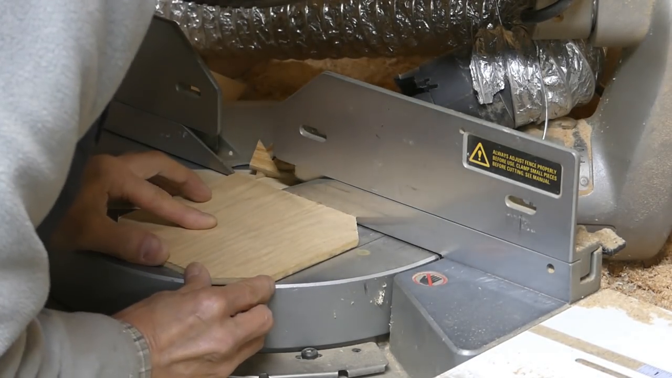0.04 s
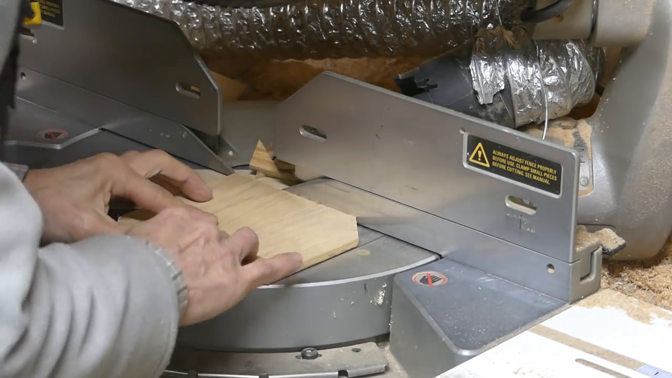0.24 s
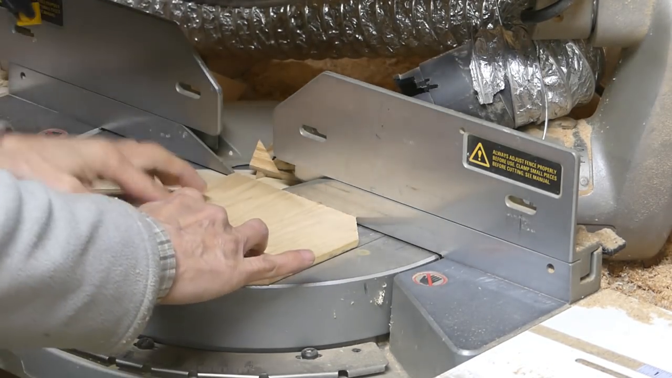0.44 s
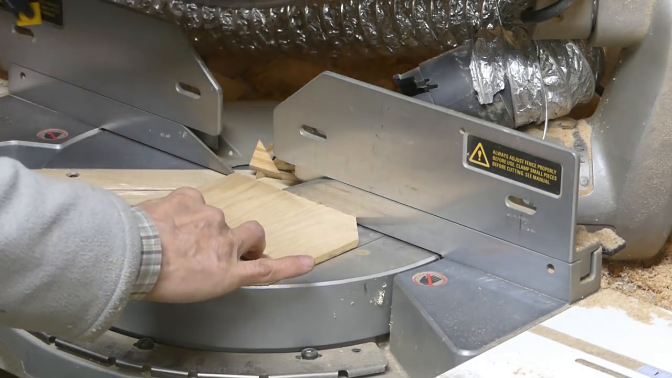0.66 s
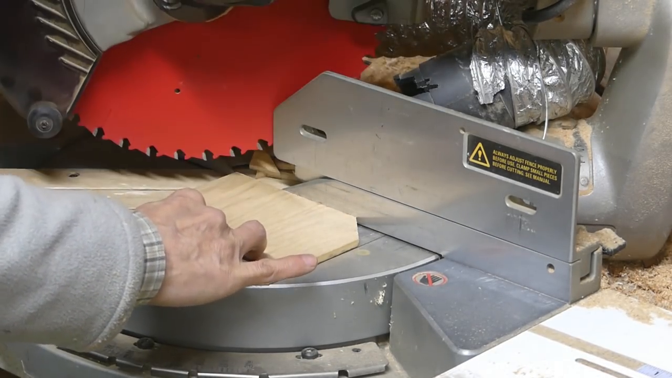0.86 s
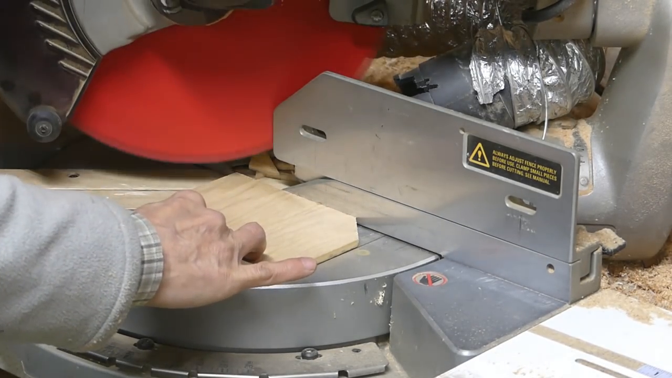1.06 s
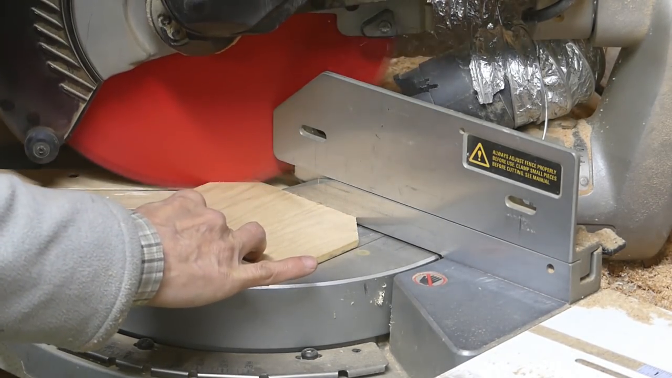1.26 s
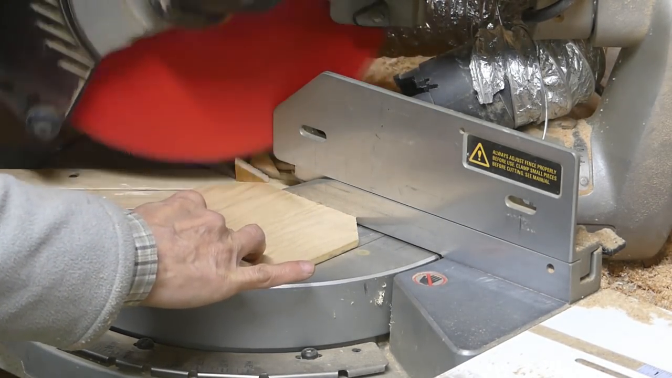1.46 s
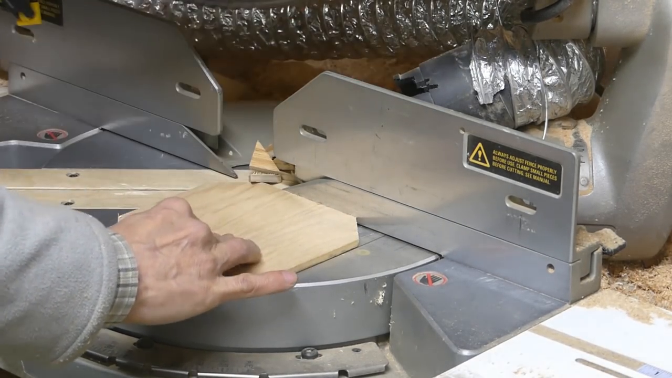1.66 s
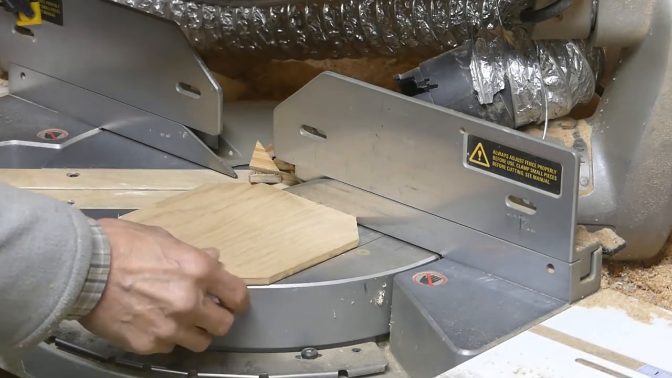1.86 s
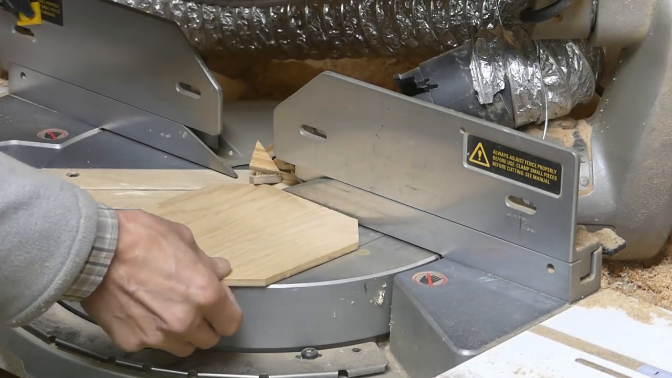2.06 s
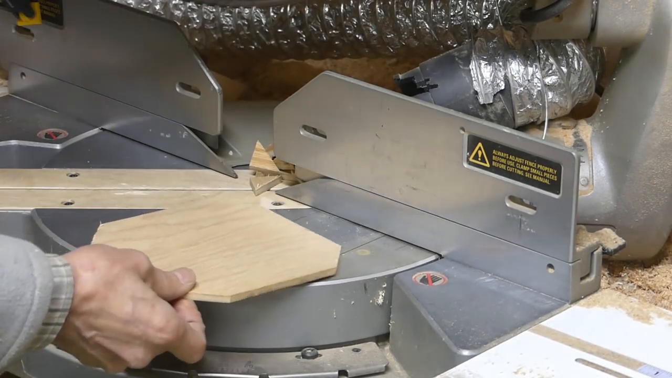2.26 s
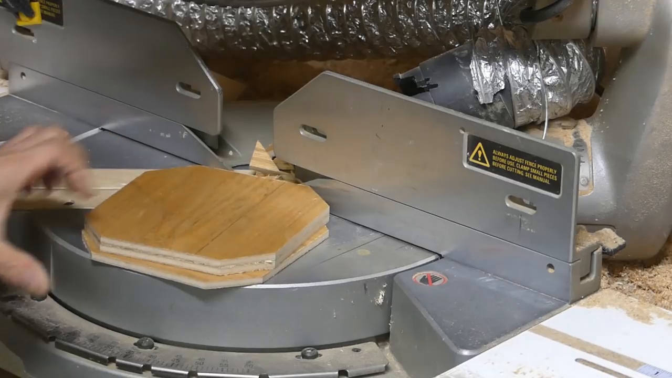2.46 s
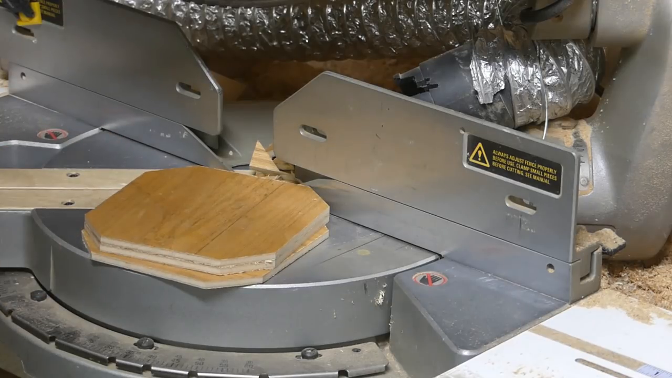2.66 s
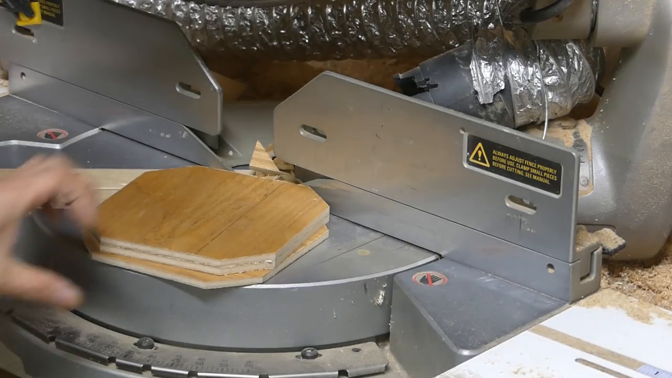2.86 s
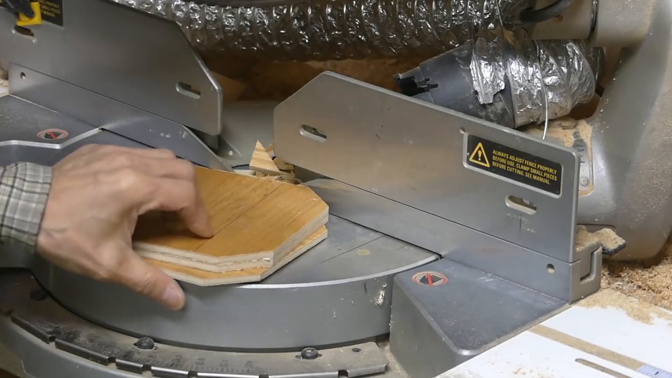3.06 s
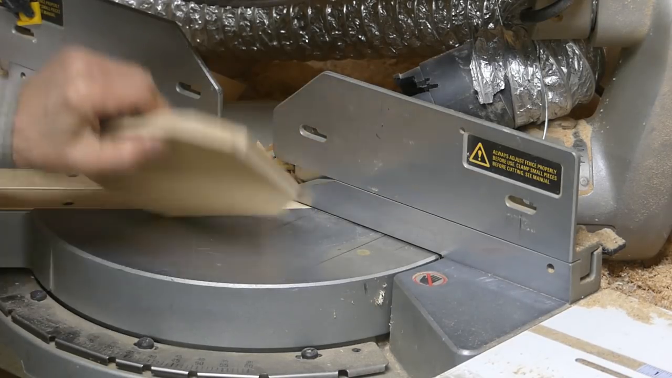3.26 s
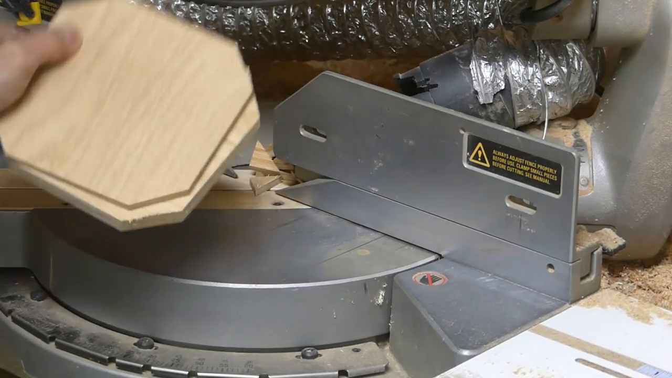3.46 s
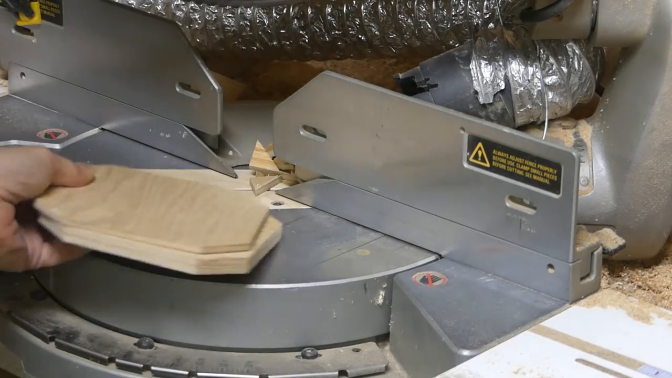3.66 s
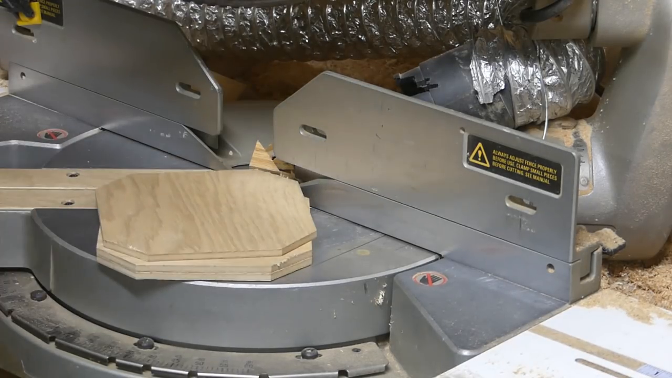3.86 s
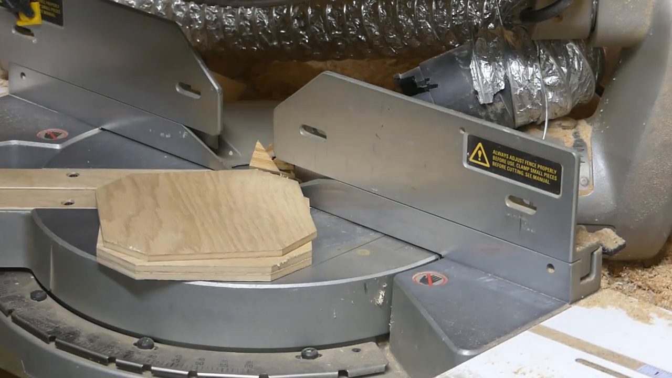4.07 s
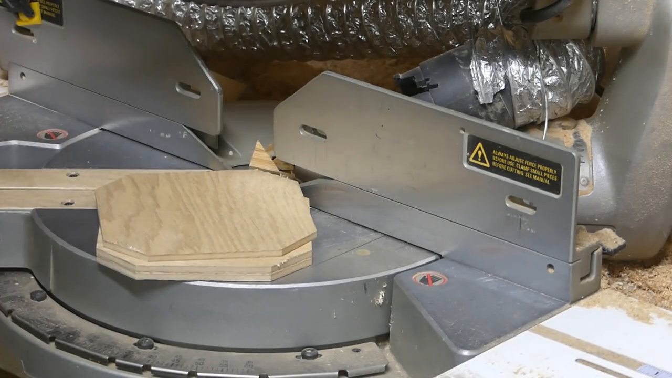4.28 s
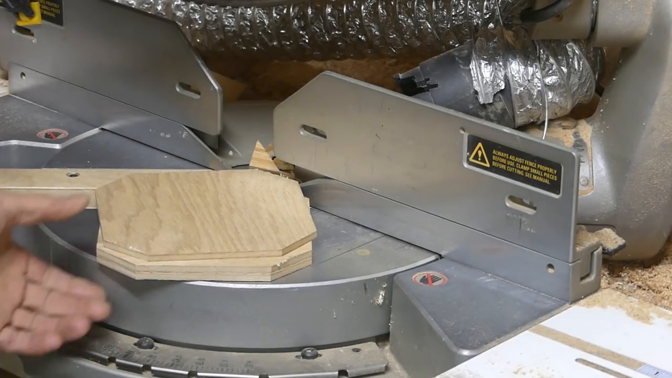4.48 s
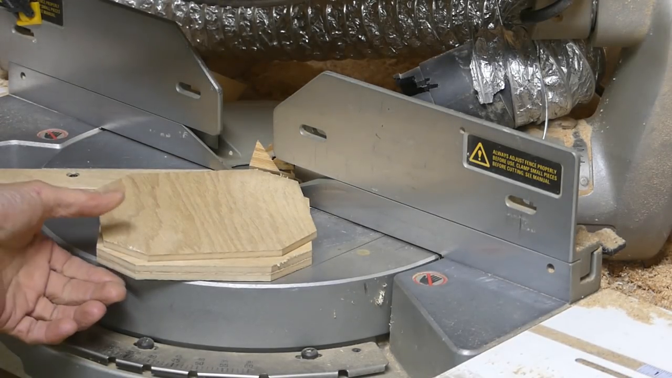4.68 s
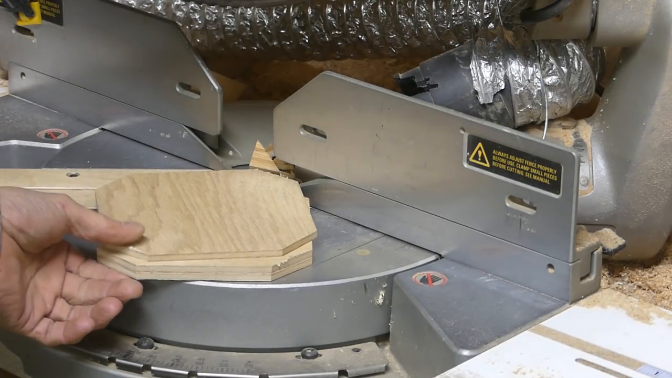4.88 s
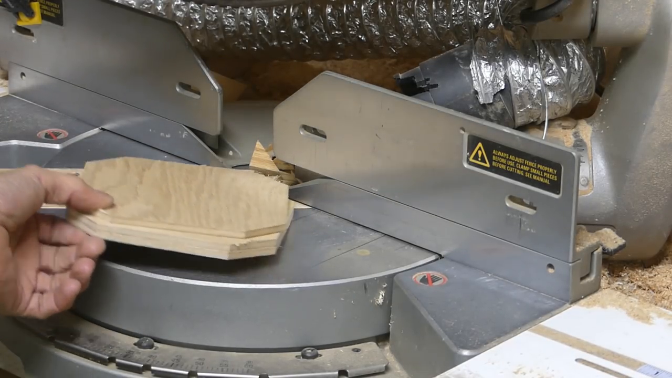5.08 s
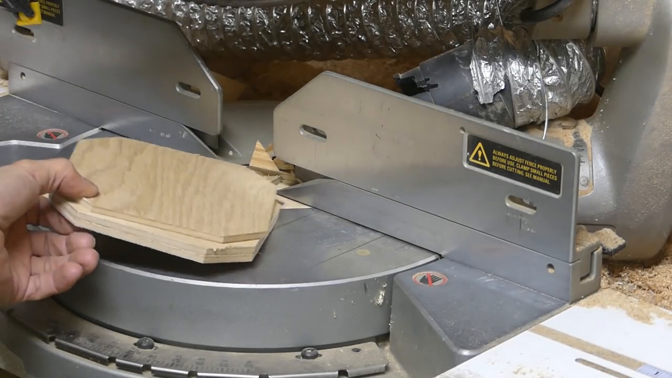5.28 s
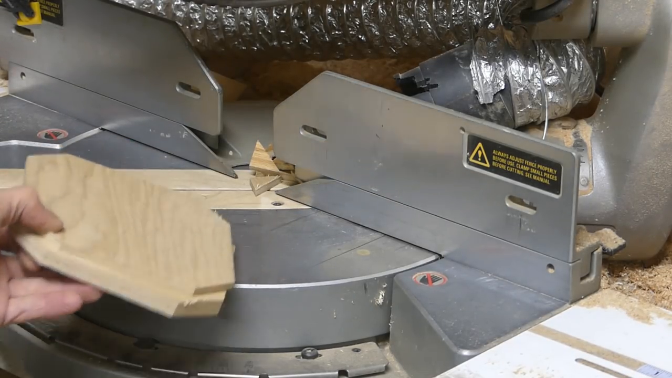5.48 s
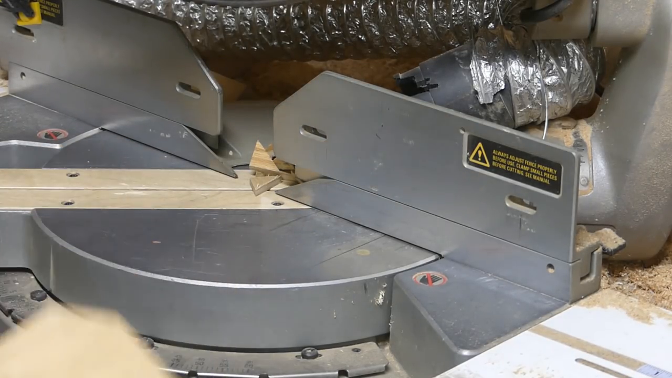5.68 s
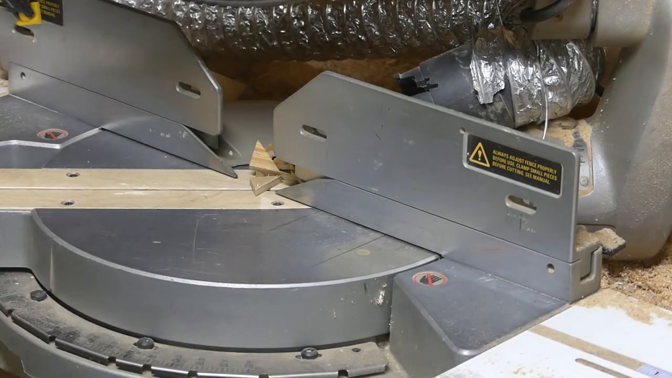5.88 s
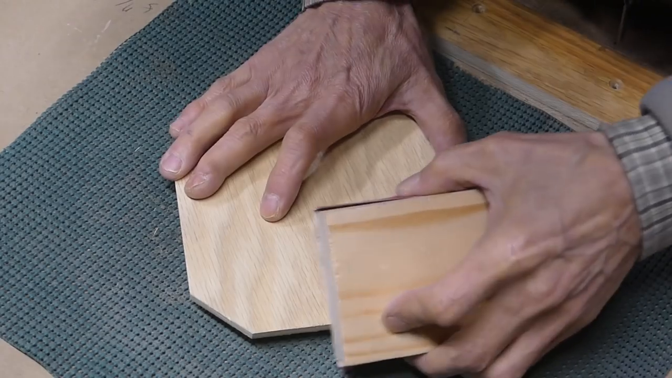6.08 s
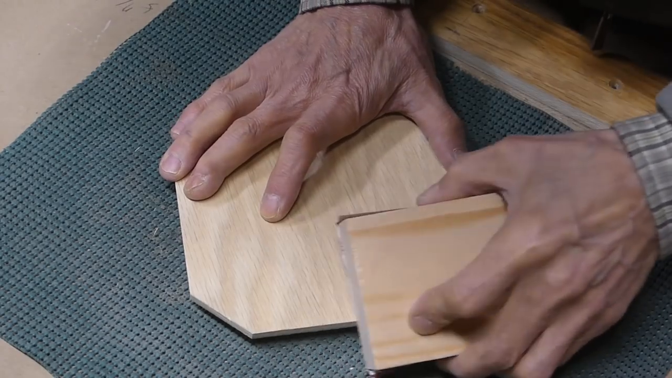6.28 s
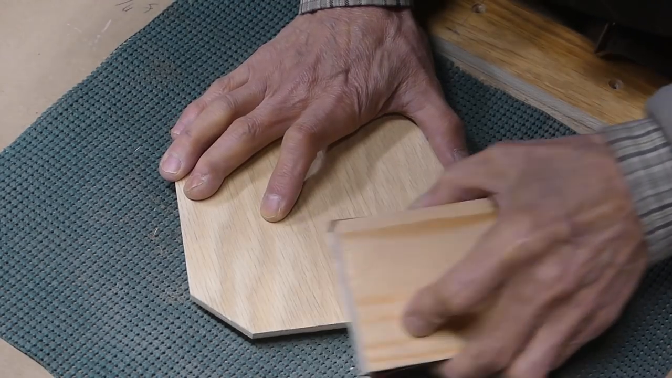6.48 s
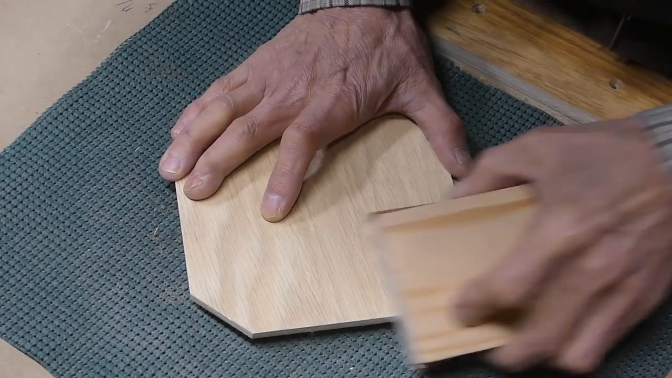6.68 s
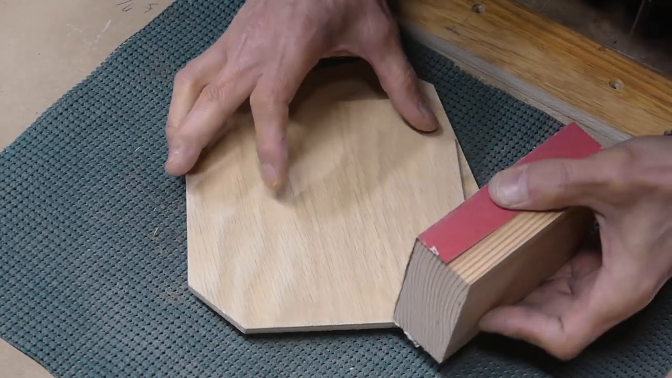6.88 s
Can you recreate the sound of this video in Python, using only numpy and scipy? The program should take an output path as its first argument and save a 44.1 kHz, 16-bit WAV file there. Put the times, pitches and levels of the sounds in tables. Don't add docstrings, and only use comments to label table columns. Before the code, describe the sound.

A dust extractor whines as a miter saw screams up, bites thin plywood and brakes; then panels clack on a steel table and get sanded briskly.

```python
import sys
import numpy as np
from scipy import signal
from scipy.fft import rfft, irfft, next_fast_len
from scipy.io import wavfile
from scipy.ndimage import uniform_filter1d, map_coordinates

SR = 44100
rng = np.random.default_rng(int(sys.argv[2]) if len(sys.argv) > 2 else 0)


def boost(x):
    u = np.asarray(x, float) / 20
    return 10 ** u


def transcribe(u):
    v = np.clip(np.atleast_2d(u).T, -1, 1)
    q = np.round(v * 32767).astype(np.int16)
    wavfile.write(sys.argv[1], SR, q)


N = 306054

# freq_hz, density_db
FLOOR = [(25, -29.5), (60, -12.5), (120, -1.5), (200, 0.5), (300, -1.5), (700, -3), (1300, -4), (1700, -9),
         (2200, -16), (3200, -22), (6000, -21.5), (10800, -23.5), (15000, -25.5), (15800, -38)]
# time_s, firing_hz, level_db
ENGINE = [(2.6, 79.3, -87), (4.0, 87.8, -49.5), (4.58, 102.8, -54), (5.0, 121.5, -64), (5.18, 133, -57),
          (5.4, 142.5, -88), (5.6, 153.3, -55.5), (5.85, 156.4, -62), (5.97, 161, -61), (6.03, 160, -90)]
# peak_s, depth_db, rise_s, fall_s
DUCK = (1.5, 6.06, 0.62, 0.8)
# freq_hz, likeness_ratio
ALIKE = [(60, 0.1), (180, 0.89), (550, 0.91), (1650, 0.78), (4970, 0.79), (15000, 0.89)]
QUIET_ALIKE = [(60, 0.085), (180, 0.15), (550, 0.03), (1650, 0.32), (4970, 0.23), (15000, 0.69)]
# freq_hz, t60_s
ROOM_T60 = [(150, 0.55), (1000, 0.41), (5000, 0.34), (12000, 0.4)]
# freq_hz, level_db
ROOM_SIDE = [(200, -4.5), (1000, 2.5), (3000, 1.5)]

# time_s, shaft_hz, air_level_db
FAN = [(0, 242.3, -23), (.99, 242.8, -22), (1.04, 236.3, -24.5), (1.1, 232.5, -26.5), (1.2, 234, -30.5),
       (1.32, 229, -34.5), (1.42, 227.3, -32), (1.55, 229.2, -31.5), (1.66, 232.8, -33), (1.75, 240, -31),
       (1.95, 243.3, -28.5), (2.32, 242.1, -26)]
# shaft_multiple, level_db
BLADE_ORDERS = [(1, -25), (2, -14.5), (3, 2), (4, -33), (5, -13), (6, 0.5), (7, -17), (8, -17), (9, -21),
                (10, -18), (11, -50), (12, -27), (13, -17.5), (14, -38), (15, -19.5)]
SLOT_ORDERS = [(33, -23), (36, -20), (54, -24)]
# freq_hz, density_db
AIR = [(24, -92), (40, -49), (400, -12), (611, -4), (659, -10), (728, -7), (805, -5), (1360, -4.5),
       (1470, -8.5), (1790, -16.5), (1980, -10), (4640, -22.5), (9340, -21.5), (15800, -28)]
# freq_hz, width_hz, over_air_db
HOSE = [(245, 17.6, 12.5), (528, 26, -0.5), (628, 26, 10.5), (954, 11.7, 6.5), (1178, 54, 2),
        (1465, 136, 7), (1980, 120, -1), (2450, 74, 1.5), (5600, 150, 7), (7700, 150, -3.5),
        (9340, 610, 7.5), (10600, 170, 6), (11700, 630, 6.5), (13200, 170, 8)]
# mid_s, pitch_hz, glide_hz_per_s, level_db, half_length_s
PASSING = [
    (2.378, 2035, -2800, -31, .045),
    (2.462, 1180, -2500, -23, .035),
    (2.435, 1235, -1500, -28, .03),
    (2.435, 2420, -4000, -40, .045),
]
# peak_s, depth_db, rise_s, fall_s
STALL = (1.335, 10, .08, 0.062)

# peak_s, rustle_db, body_db, rise_s, fall_s
SLIDES = [(3.035, -53, -74, .012, .2), (3.146, -47.5, -57, 0.044, 0.099), (3.305, -30.5, -31, 0.057, 0.096),
          (3.78, -39.5, -52, 0.064, 0.3), (4.03, -50.5, -77, 0.62, 0.18), (4.508, -59.5, -64, 0.11, .06),
          (4.576, -64, -54.5, 0.058, 0.141), (5.07, -55.5, -52, 0.039, 0.15),
          (5.196, -62, -61, 0.096, 0.092), (5.35, -52.5, -70, .04, 1), (5.43, -48.5, -68, 0.15, 0.24),
          (5.53, -49.5, -57, 0.37, 0.13), (5.7, -57, -58, 0.4, 0.27), (5.955, -47, -66, 0.046, 0.11),
          (6.04, -44.5, -50, 0.073, 0.1)]
# peak_s, grit_db, rasp_db, rise_s, fall_s
STROKES = [
    (6.182, -27, -31, 0.059, 0.11),
    (6.312, -26, -29.5, 0.061, 0.058),
    (6.413, -23.5, -36, 0.056, 0.068),
    (6.525, -24.5, -35, 0.096, 0.07),
    (6.628, -24, -36, 0.045, 0.06),
    (6.72, -23.5, -33, 0.089, 0.076),
]
# freq_hz, density_db
GRIT = [(880, -42), (1500, -15), (1640, -16), (1880, -2), (2270, -15), (2760, -4), (3530, -0.5), (4520, -3),
        (5840, -4), (9370, -4.5), (15800, -12)]
RASP = [(240, -45), (400, -19), (791, 1), (977, -6.5), (1450, 5), (1590, -8), (1770, 2.5), (2600, 2),
        (3380, -20), (5720, -120)]
RUSTLE = [(1060, -18), (1800, -23), (2040, -4.5), (2520, -10), (5120, -10), (6970, -15), (11000, -17.5),
          (15800, -31)]
BODY = [(100, -44), (200, -12), (500, -27), (800, -6), (1200, -2.5), (2000, -9.5), (2800, -17),
        (4500, -60.5)]
# freq_hz, width_hz, level_db
EDGE = [(2420, 50, 3), (2850, 65, 3), (3170, 40, 7), (3510, 35, 8), (4140, 30, -4), (4200, 50, -1),
        (5300, 80, -0.5), (6380, 90, -2), (7070, 50, 0)]
# peak_s, freq_hz, width_hz, level_db
STROKE_BANDS = [(6.17, 4970, 900, -34), (6.18, 1470, 200, -41), (6.185, 3200, 900, -38),
                (6.21, 2480, 600, -40), (6.28, 1850, 200, -47), (6.29, 2600, 500, -52),
                (6.311, 3130, 500, -32), (6.313, 5200, 500, -33.5), (6.34, 3400, 500, -42.5),
                (6.39, 5600, 700, -33), (6.412, 3000, 700, -29), (6.44, 3900, 700, -38.5),
                (6.48, 2850, 400, -39), (6.514, 2900, 700, -32), (6.516, 5900, 500, -31.5),
                (6.535, 6750, 500, -36), (6.545, 3650, 800, -34.5), (6.6, 3600, 607, -40),
                (6.615, 5860, 696, -31), (6.63, 2920, 800, -30.5), (6.69, 2860, 500, -35.5),
                (6.71, 3100, 700, -35), (6.725, 5900, 1500, -28), (6.735, 3900, 800, -34.5),
                (6.76, 1120, 300, -52.5)]
# peak_s, freq_hz, width_hz, level_db,
# rise_s, fall_s
DRAGS = [(.848, 4500, 4000, -31, .025, .05), (1.0, 2900, 600, -27, .015, .03),
         (1.03, 2050, 400, -24, .05, .1), (1.078, 3500, 700, -27, .04, .04),
         (2.328, 6100, 500, -31, .012, .03), (2.482, 2500, 3000, -38, .02, .02),
         (5.075, 4200, 1500, -60, .04, .06), (5.095, 1400, 90, -56, .04, .08),
         (5.096, 2200, 90, -60, .05, .06), (5.39, 5900, 300, -59, .12, .1), (5.4, 5250, 150, -61, .1, .1),
         (5.41, 4200, 120, -61, .12, .12), (5.45, 7050, 200, -62, .12, .14)]

# start_s, clack_db, boom_db, knock_db, crack_db
BLOWS = [(2.489, -3.5, -19, -74, -17), (2.4965, -22, -34, -24.5, -8), (3.3081, -14.5, -42, -33.5, -37),
         (3.6549, -14.5, -40, -37, -13), (3.664, -18, -42, -36, -18), (3.7389, -10, -42, -42, -25),
         (3.7473, -15, -37, -36.5, -34), (3.8426, -5.5, -19, -24, -14), (3.8491, -2.5, -23.5, -23.5, 3),
         (3.8673, -23, -37, -20.5, -41.5), (4.573, -41, -49, -49.5, -65), (4.8973, -47, -51, -58, -73),
         (4.995, -59, -60, -52, -67), (5.0873, -43, -71, -68, -56), (5.519, -31, -72, -56, -46)]
# freq_hz, level_db, t60_s
PANEL_MODES = [(235, -5, .06), (377, 0, .06), (452, -5, .05)]
# start_s, level_db, pitch_hz, t60_s
THUDS = [(2.479, -19, 368, 0.041), (2.493, -13.5, 426, .04), (2.492, -19, 241.7, .15),
         (2.5065, -10.5, 408, 0.037), (2.497, -11, 1395, 0.028), (2.548, -23, 435, 0.078),
         (3.35, -38, 375, 0.19), (3.657, -24.5, 361, 0.063), (3.657, -27.5, 228, 0.08),
         (3.657, -30, 950, .04), (3.659, -28, 1580, 0.045), (3.718, -29, 390, 0.079), (3.74, -30, 740, .04),
         (3.744, -24, 1006, 0.045), (3.742, -22.5, 1490, 0.037), (3.745, -27.5, 363, 0.16),
         (3.745, -31.5, 225, .15), (3.845, -16.5, 665, 0.052), (3.846, -18, 391, 0.089),
         (3.849, -14, 1120, 0.066), (3.854, -20.5, 533, 0.12), (3.866, -16.5, 706, 0.058),
         (4.9, -46, 188, 0.13), (6.0065, -26.5, 192, 0.087), (6.0065, -29.5, 295, 0.07),
         (6.035, -34.5, 250, 0.11), (6.129, -54, 106.5, .99), (6.174, -34, 790, .04),
         (6.671, -36, 264, 0.063), (6.767, -50, 202, .044)]
# start_s, peak_db, pitch_hz, t60_s
SNAPS = [(.9965, -7, 1050, .015), (1.003, -8, 1870, .015), (1.016, -11, 2150, .01),
         (1.074, -12, 1900, .006), (3.3085, -12, 2200, .003), (3.853, -9, 2800, .004),
         (2.4775, -28, 4200, .012), (2.4899, -4, 1750, .005), (2.4943, -11, 3300, .004),
         (2.4975, -9, 1500, .003), (3.6556, -32, 3000, .004), (3.66, -29, 3200, .004),
         (3.7392, -16, 2600, .004), (3.7448, -17, 2300, .005), (3.7498, -18, 2900, .005),
         (3.8435, -14, 2000, .004), (3.8497, 6.5, 2400, .0028)]
# pitch_multiple, level_db
SNAP_OVERTONES = [(1, 0), (1.7, -5), (2.6, -10), (3.9, -17)]
# start_s, peak_db
TICK = (6.8647, -23.5)

# time_s, tooth_hz
TEETH = [(1.05, 1950), (1.15, 2980), (1.25, 3700), (1.535, 4780), (1.59, 4280), (1.65, 3300), (1.78, 2220),
         (1.87, 1655), (2.05, 950)]
# time_s, level_db
WHINE = [(1.03, -34), (1.13, -20), (1.3, -29), (1.55, -24.5), (1.62, -30), (1.66, -24), (1.77, -27),
         (1.84, -19.5), (1.95, -23)]
# time_s, level_db
ROAR = [(.988, -46), (1.002, -17), (1.04, -21.5), (1.24, -18.5), (1.39, -23), (1.45, -18.5), (1.67, -20),
        (1.7, -24), (2.47, -32)]
# freq_hz, density_db
MOTOR = [(60, -96), (200, -33), (400, -17.5), (700, -33), (1100, -3.5), (1600, -9), (2500, -6),
         (4600, -6.5), (6500, -10.5), (9000, -19), (12000, -48)]
HISS = [(4000, -25), (6500, 2.5), (8500, -4.5), (10000, -2.5), (11500, -0.5), (14000, -1.5), (15800, -4)]
# freq_hz, width_hz, level_db
PLATE = [(1190, 50.6, 4.5), (1850, 55, 9.5), (2097, 46.3, 9.5), (3810, 45, -20.5), (4100, 79, 1.5),
         (10860, 150, 5)]
# freq_hz, width_hz, level_db
GUARD = [(1850, 80, -5), (2240, 120, -4), (2620, 61, 6.5), (3200, 79, 0), (3510, 60, -3), (3650, 150, -3),
         (3870, 64, 2), (4540, 90, 7), (4770, 100, -6)]
# peak_s, level_db, rise_s, fall_s
BITE = (1.325, -32, .09, .055)
GEAR = (1.47, -28, .08, .15)
# mid_s, pitch_hz, glide_hz_per_s, level_db,
# half_length_s
WHISTLES = [
    (1.085, 12700, 65000, -41, .06),
    (2.0, 13500, -42000, -42, .09),
    (1.3, 9350, 5000, -38, .05),
    (1.85, 10920, 1, -42, .5),
    (2.4, 11700, -15000, -44, .06),
]
# mid_s, pitch_hz, glide_hz_per_s, level_db, half_length_s
FLARES = [(1.062, 1180, 5000, -26, .04), (1.12, 2650, 4000, -28, .03), (1.145, 2830, 500, -25, .025),
          (1.17, 3200, 8000, -27, .025), (1.232, 3465, 500, -25, .03), (1.268, 3890, 2500, -27, .04),
          (1.3, 3745, 1000, -23, .045), (1.345, 4150, 3000, -31, .05), (1.39, 4320, 2000, -28, .03),
          (1.435, 4450, 1000, -26, .03), (1.435, 4100, 1500, -30, .03), (1.49, 4620, 2500, -29, .05),
          (1.49, 2900, -1000, -33, .04), (1.54, 4790, 500, -27, .03), (1.56, 4620, -4000, -27, .025),
          (1.585, 4430, -4000, -27, .03), (1.6, 4080, -5000, -30, .03), (1.655, 3210, -2000, -25, .04),
          (1.69, 2980, -500, -30, .02), (1.72, 2660, -4000, -27, .04), (1.785, 2640, -1000, -34, .03),
          (1.83, 1880, -5500, -21, .055), (1.875, 1790, -500, -27, .025), (1.82, 3680, -8000, -30, .05),
          (1.93, 2680, -5000, -35, .03)]
# start_s, peak_db, ring_hz, ring_db, t60_s
JOLTS = [
    (.85, -20, 4100, -16, 0.029),
    (0.994, -26, 245, -35.5, 1),
    (1.655, -12.5, 1190, -8, 0.072),
    (1.66, -32, 1850, -11.5, 0.046),
    (2.325, -23, 6180, -22, 0.024),
]

SAW_ON_S, SAW_OFF_S, FAN_OFF_S, CUT_S = .995, 1.75, 2.332, 2.473
FLOOR_DB, TOP_HZ = -50.5, 15800
TONE_DB, TONE_GROWS, STARVED_DB, STARVED_BLUR = -2, 1.08, 7.5, 2.96
RUN_DOWN_HZ_PER_S, RUN_DOWN_DB = 365, 12
SWELL_DB = 20
HISS_DB, HISS_PER_OCTAVE_DB = -9.5, 1.5
SKIRT_DB, SKIRT_PER_OCTAVE_DB = -2, 7
SIDEBAND, SIDEBAND_DB, GEAR_RATIO = .93, -11, 4.15
SECOND_DB, THIRD_DB, OVERTONE_SAG = -18, -29, .965
ROAR_FLUTTER_DB = .8
RATTLE_T60_S = 0.052
THUD_ROOM_DB, THUD_FAR_S = -2, 6
STROKE_ROUND, REST_DB = 1.36, -52.5
EDGE_DB = 5
BAND_RISE_S, BAND_FALL_S = 0.027, 0.027


def unit(x):
    return x / np.sqrt(np.mean(x ** 2) + 1e-20)


def along(points, hz):
    f, v = np.transpose(points)
    return np.interp(np.log(hz + 1), np.log(f + 1), v)


def curves(rows, outside=None):
    s, *cols = np.transpose(rows)
    return [np.interp(np.arange(N) / SR, s, c, outside, outside) for c in cols]


def wobble(rate_hz):
    knots = rng.standard_normal(int(N * rate_hz / SR) + 4)
    return map_coordinates(knots, [np.arange(N) * rate_hz / SR], order=2)


def swell(s, rise_s, fall_s, bend=1):
    t = np.arange(N) / SR - s
    return -SWELL_DB * np.where(t < 0, -t / rise_s, t / fall_s) ** bend


def gestures(rows, bend=1):
    levels_db = [np.add.outer([a_db, b_db], swell(s, rise_s, fall_s, bend))
                 for s, a_db, b_db, rise_s, fall_s in rows]
    return np.max(levels_db, axis=0)


def rush(spectrum, alike, peaks=(), grain_db=0., flutter_db=0.):
    m = next_fast_len(N + 8192)
    hz = np.fft.rfftfreq(m, 1 / SR)
    grains = boost(grain_db * np.minimum(rng.exponential(size=N), 7) + flutter_db * wobble(60))
    peaks_db = sum(db / (1 + (2 * (hz - c) / w) ** 2) for c, w, db in peaks)
    gain = boost(along(spectrum, hz) + peaks_db)
    turn = np.arccos(np.clip(along(alike, hz), -1, 1)) / 2
    source = rfft(grains * rng.standard_normal((2, N)), m)
    mid, side = irfft(source * gain * [np.cos(turn), np.sin(turn)], m)[:, :N]
    return unit(np.array([mid + side, mid - side]))


def tone(hz, blur_hz, waver_db):
    turns = np.cumsum(hz + blur_hz * wobble(90)) / SR + rng.random()
    return np.sqrt(2) * boost(waver_db * wobble(45.005)) * np.sin(2 * np.pi * turns)


def whine(hz, width_hz):
    phase = 2 * np.pi * np.cumsum(hz) / SR
    return unit(wobble(width_hz) * np.sin(phase) + wobble(width_hz) * np.cos(phase))


def ring(modes, t, attack_s):
    strengths_db = rng.normal(0, 1.5, len(modes))
    body = sum(boost(db + g - 60 * t / t60) * np.sin(2 * np.pi * hz * t)
               for g, (hz, db, t60) in zip(strengths_db, modes))
    return body * (1 - np.exp(-t / attack_s))


def burst(t, low_hz, high_hz, t60_s, attack_s=1e-4, order=2):
    band = signal.butter(order, [low_hz, high_hz], "band", fs=SR)
    noise = unit(signal.lfilter(*band, rng.standard_normal(len(t))))
    puff = noise * boost(-60 * t / t60_s) * (1 - np.exp(-t / attack_s))
    click = signal.lfilter(*band, t == 0)
    return np.array([puff, click * np.linalg.norm(puff) / np.linalg.norm(click)])


def add(track, s, sound):
    part = track[..., round(s * SR):][..., :sound.shape[-1]]
    part += sound[..., :part.shape[-1]]


def room(sound):
    hz, t, z = signal.stft(rng.standard_normal((2, SR // 2)), SR, nperseg=256)
    z[1] *= boost(along(ROOM_SIDE, hz))[:, None]
    decay = boost(-60 * t / along(ROOM_T60, hz)[:, None])
    mid, side = signal.istft(z * decay, SR, nperseg=256)[1]
    tail = np.array([mid + 0.26 * side, mid - 0.37 * side]) / np.linalg.norm(mid)
    return signal.fftconvolve(np.pad(sound, (150, 0))[None], tail, axes=1)


def background():
    firing_hz, engine_db = curves(ENGINE)
    drone = sum(boost(g) * tone(k * firing_hz, blur_hz=1.5, waver_db=2.5)
                for k, g in enumerate([-3, -3, -3, -3, -8], 1))
    peak_s, depth_db, rise_s, fall_s = DUCK
    floor_db = FLOOR_DB - depth_db * boost(swell(peak_s, rise_s, fall_s, bend=3.7)) + 1.0 * wobble(5.3)
    hum = boost(floor_db) * rush(FLOOR, QUIET_ALIKE, flutter_db=0.5)
    return boost(engine_db - 6.0) * drone + hum * boost([[.4], [-.4]])


def extractor():
    t = np.arange(N) / SR
    shaft_hz, air_db = curves(FAN)
    coasting_s = np.clip(t - FAN_OFF_S, 0, CUT_S - FAN_OFF_S)
    shaft_hz = shaft_hz - RUN_DOWN_HZ_PER_S * coasting_s
    starved = uniform_filter1d(1. * (t > SAW_ON_S + .05) * (t < SAW_OFF_S), SR // 15)
    stall_s, stall_db, rise_s, fall_s = STALL
    tone_db = air_db.max() + TONE_DB + TONE_GROWS * (air_db - air_db.max()) - STARVED_DB * starved
    tone_db = tone_db - stall_db * boost(swell(stall_s, rise_s, fall_s, bend=2))
    tone_db = tone_db - RUN_DOWN_DB * np.minimum(coasting_s / 0.055, 1)
    lines = 0
    for k, db in BLADE_ORDERS + SLOT_ORDERS:
        blur_hz = 0.554 * k * (1 + 2 * (k > 6) + STARVED_BLUR * starved)
        waver_db = 0.8 + 2.2 * starved + 2.5 * (k > 6)
        lines = lines + boost(db) * tone(k * shaft_hz, blur_hz, waver_db)
    air = boost(air_db - 20 * coasting_s + 0.62 * wobble(8.12)) * rush(AIR, ALIKE, HOSE, flutter_db=0.8)
    out = boost(tone_db) * lines * boost([[-.4], [.4]]) + air
    for s, hz, glide, db, half_s in PASSING:
        pitch_hz = hz + glide * np.clip(t - s, -half_s, half_s)
        out = out + boost(db + swell(s, half_s, half_s, bend=2)) * tone(pitch_hz, blur_hz=9, waver_db=2.5)
    return out * boost(np.where(t > CUT_S, -19 - 400 * (t - CUT_S), 0))


def scrape(track, s, hz, width_hz, db, rise_s, fall_s):
    t = np.arange(-SR // 5, SR // 5) / SR
    peak = signal.iirpeak(hz, hz / width_hz, SR)
    mid, side = signal.lfilter(*peak, rng.standard_normal((2, len(t))))
    shape = boost(db - SWELL_DB * np.where(t < 0, -t / rise_s, t / fall_s) ** 2.14) / np.std(mid)
    add(track, s - .2, shape * np.array([mid + .3 * side, mid - .3 * side]))


def grainy(colour, peaks=()):
    return rush(colour, ALIKE, peaks, grain_db=2.1, flutter_db=2)


def friction():
    rustle_db, body_db = gestures(SLIDES)
    resting_db = np.where(np.arange(N) > STROKES[0][0] * SR, REST_DB, -120)
    grit_db, rasp_db = np.maximum(gestures(STROKES, bend=STROKE_ROUND), resting_db)
    slide = boost(rustle_db - 0.5) * grainy(RUSTLE) + boost(body_db + 2.5) * grainy(BODY)
    sand = boost(grit_db - 3.0) * grainy(GRIT, [(c, w, EDGE_DB + db) for c, w, db in EDGE])
    sand = sand + boost(rasp_db - 8.0 + 4.3 * wobble(25)) * grainy(RASP)
    for row in STROKE_BANDS:
        scrape(sand, *row, BAND_RISE_S, BAND_FALL_S)
    for row in DRAGS:
        scrape(slide, *row)
    return slide + sand * boost([[-.2], [.2]])


def blows():
    out, t = np.zeros((2, N)), np.arange(SR // 4) / SR
    for s, clack_db, boom_db, knock_db, crack_db in BLOWS:
        boom = 0.75 * ring(PANEL_MODES, t, attack_s=0.0015) + burst(t, 218, 436, t60_s=0.049)
        knock = burst(t, 466, 1050, t60_s=0.064)
        clack = burst(t, 1060, 3840, RATTLE_T60_S, attack_s=0.0004, order=3)
        crack = burst(t, 3500, 9600, RATTLE_T60_S, attack_s=0.00046)
        low = boost(boom_db) * boom + boost(knock_db + 3.0) * knock
        puff, click = low + boost(clack_db - 13) * clack + boost(crack_db - 34.0) * crack
        add(out, s, (puff + 0.033 * click) * boost([[-.5], [.5]]))
        add(out, s, boost(3.5) * room(click))
    for s, db, hz, t60_s in THUDS:
        thud = np.sin(2 * np.pi * hz * t) * boost(db - 60 * t / t60_s) * (1 - np.exp(-t / 0.0014))
        add(out, s, thud[None])
        add(out, s, boost(THUD_ROOM_DB - 18 * (s > THUD_FAR_S)) * room(thud[:SR // 50]))
    for s, db, hz, t60_s in SNAPS:
        snap = sum(boost(db + g - 3 - 60 * t / t60_s) * np.sin(2 * np.pi * k * hz * t)
                   for k, g in SNAP_OVERTONES)
        add(out, s, snap[None] * (1 - np.exp(-t / .0001)))
    tick_s, tick_db = TICK
    tick = burst(t, 6260, 13980, t60_s=0.0041)[:1]
    add(out, tick_s, boost(tick_db) * tick * (1 - np.exp(-t / .0003)))
    return signal.lfilter(*signal.butter(2, 70, "high", fs=SR), out)


def flare(track, s, hz, glide, db, half_s):
    t = np.arange(-SR // 10, SR // 10) / SR
    noise = rng.standard_normal((2, len(t)))
    drift, flutter = uniform_filter1d(noise, SR // 120) * np.sqrt(SR // 120)
    turns = np.cumsum(hz + glide * t + 22 * drift) / SR
    level = boost(db - SWELL_DB * (t / half_s) ** 2 + 2.5 * flutter)
    add(track, s - .1, np.sqrt(2) * level * np.sin(2 * np.pi * turns))


def blade_song(tooth_hz):
    whine_db, = curves(WHINE, outside=-120)
    bite, gear = (boost(db + swell(s, rise_s, fall_s, bend=3.8)) for s, db, rise_s, fall_s in (BITE, GEAR))
    guard_db = sum(db / (1 + ((tooth_hz - c) / w) ** 2) for c, w, db in GUARD)
    main_db = whine_db + guard_db + 2.5 * wobble(90) + 2 * wobble(30) - 6.5
    song = boost(main_db) * whine(tooth_hz, width_hz=200)
    sideband_db = whine_db + SIDEBAND_DB + 4 * wobble(25)
    song = song + boost(sideband_db) * whine(SIDEBAND * tooth_hz, width_hz=150)
    second = (boost(whine_db + SECOND_DB) + bite) * boost(2.5 * wobble(25) - 1)
    song = song + second * whine(2 * OVERTONE_SAG * tooth_hz, width_hz=200)
    third = boost(whine_db + THIRD_DB) + bite
    song = song + third * whine(3 * OVERTONE_SAG * tooth_hz, width_hz=260)
    song = song + gear * whine(tooth_hz / GEAR_RATIO, width_hz=70)
    skirt_db = whine_db + SKIRT_DB + SKIRT_PER_OCTAVE_DB * np.log2(tooth_hz / tooth_hz.max())
    song = song + boost(skirt_db) * whine(tooth_hz, width_hz=1400)
    flares = np.zeros(N)
    for row in FLARES:
        flare(flares, *row)
    return song + boost(1.0) * flares


def saw():
    tooth_hz, = curves(TEETH)
    song = blade_song(tooth_hz)
    out = boost(-2) * song + boost(-8) * room(song)[:, :N]
    for s, hz, glide, db, half_s in WHISTLES:
        pitch_hz = hz + glide * np.clip(np.arange(N) / SR - s, -half_s, half_s)
        out = out + boost(db + swell(s, half_s, half_s, bend=2)) * whine(pitch_hz, width_hz=.025 * hz)
    roar_db, = curves(ROAR, outside=-120)
    hiss_db = roar_db + HISS_DB + HISS_PER_OCTAVE_DB * np.log2(tooth_hz / tooth_hz.max())
    out = out + boost(roar_db - 4.0) * rush(MOTOR, ALIKE, PLATE, flutter_db=ROAR_FLUTTER_DB)
    out = out + boost(hiss_db + 4.5) * rush(HISS, ALIKE, PLATE, flutter_db=ROAR_FLUTTER_DB)
    t = np.arange(SR // 5) / SR
    for s, db, hz, ring_db, t60_s in JOLTS:
        puff, click = boost(db - 8.5) * burst(t, 903, 8900, t60_s=0.18, attack_s=0.0035)
        add(out, s, puff[None] + ring([(hz, ring_db, t60_s)], t, attack_s=0.0035))
        add(out, s, boost(-16.0) * room(click))
    return out * (np.arange(N) < CUT_S * SR)


def scene():
    return background() + extractor() + friction() + blows() + saw()


def roll_off(x):
    return signal.sosfilt(signal.butter(12, 16430, fs=SR, output="sos"), x)


def record(dry):
    hz = np.fft.rfftfreq(N, 1 / SR)
    response = (hz < TOP_HZ) / np.sqrt(1 + (75 / (hz + 1)) ** 1.7)
    heard = irfft(rfft(dry) * response, N)
    mix = heard / (1 + np.abs(heard / 1.1) ** 6) ** (1 / 6)
    return roll_off(mix)


dry = scene()
out = record(dry)
transcribe(out)
```